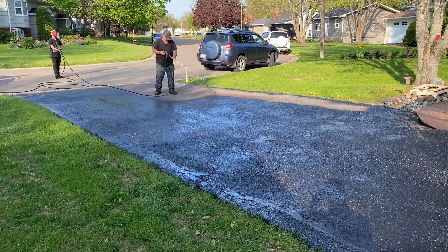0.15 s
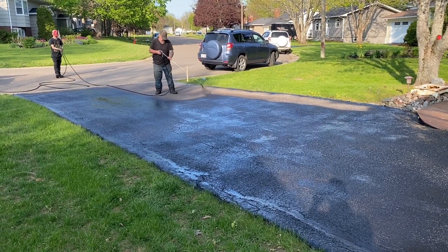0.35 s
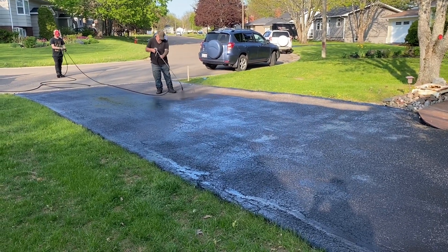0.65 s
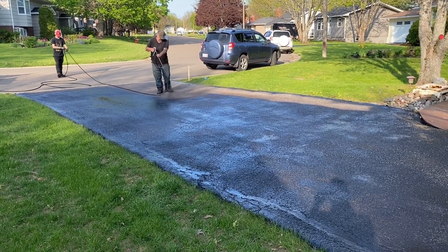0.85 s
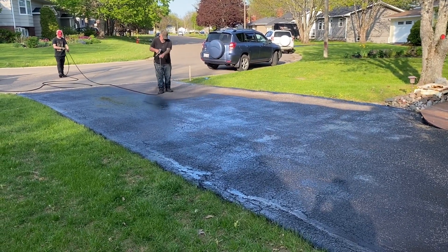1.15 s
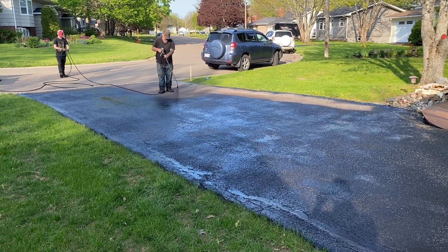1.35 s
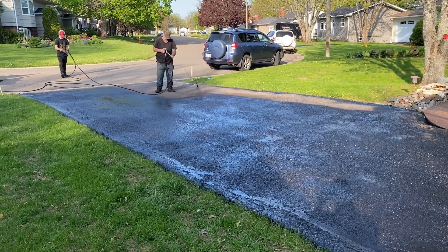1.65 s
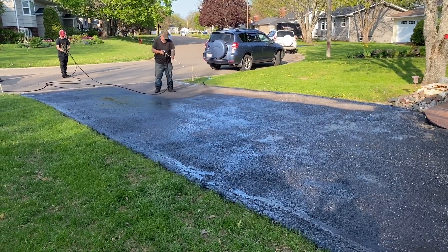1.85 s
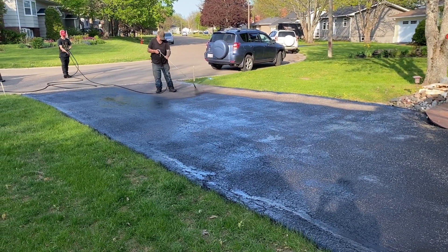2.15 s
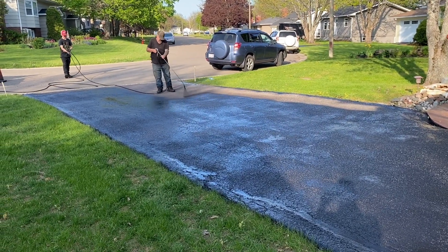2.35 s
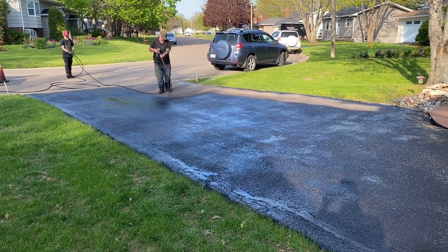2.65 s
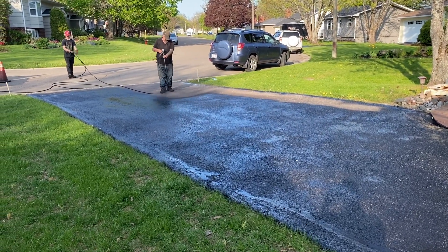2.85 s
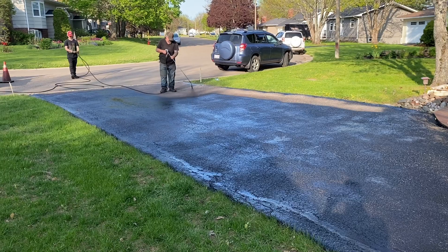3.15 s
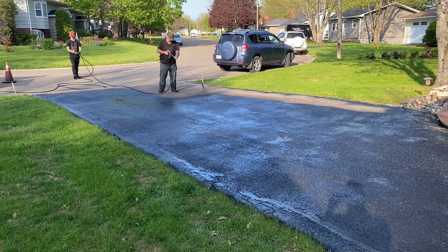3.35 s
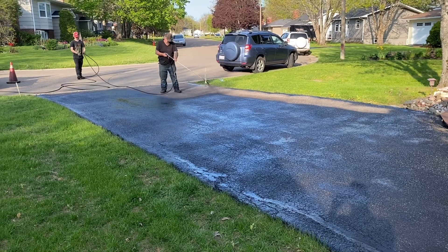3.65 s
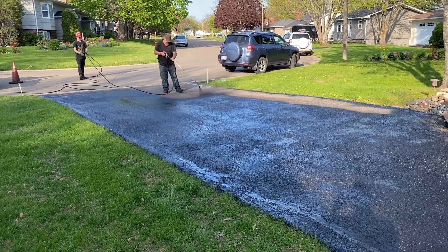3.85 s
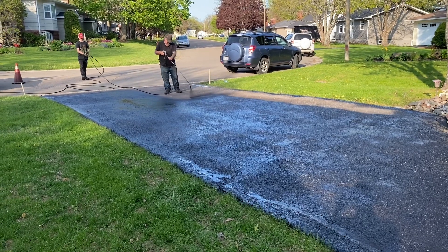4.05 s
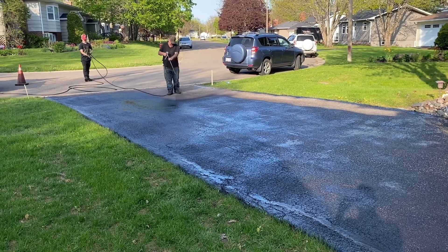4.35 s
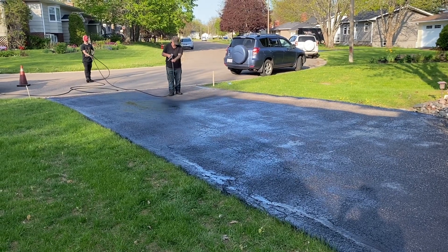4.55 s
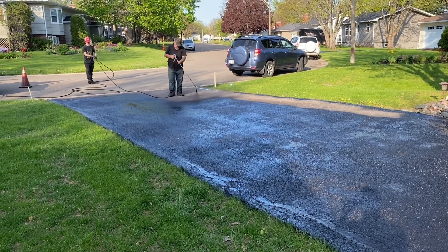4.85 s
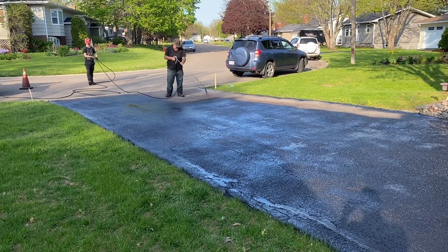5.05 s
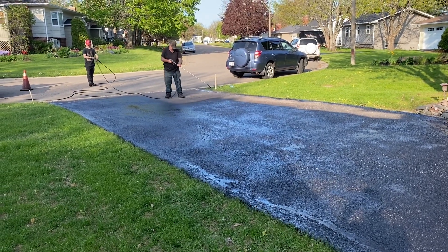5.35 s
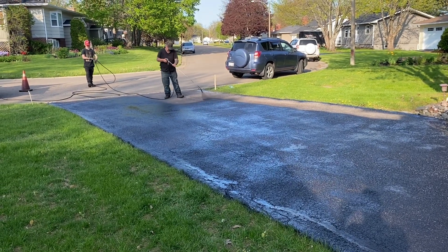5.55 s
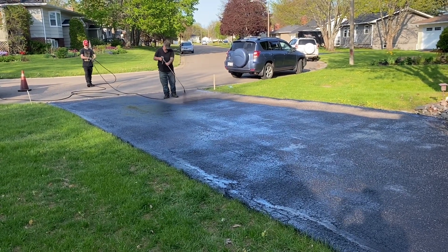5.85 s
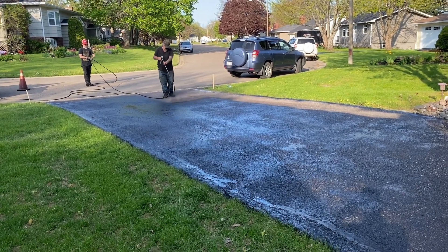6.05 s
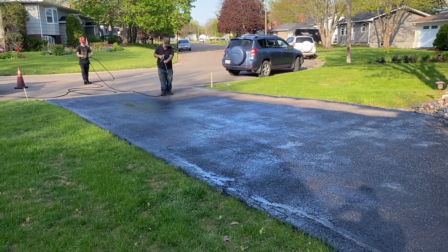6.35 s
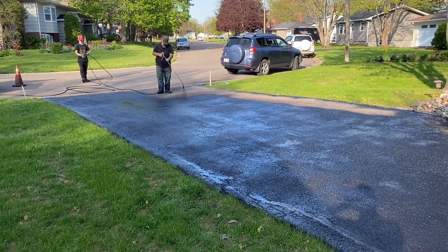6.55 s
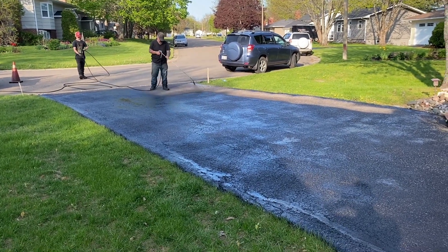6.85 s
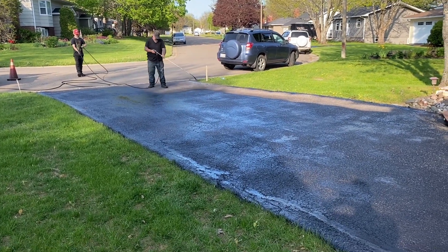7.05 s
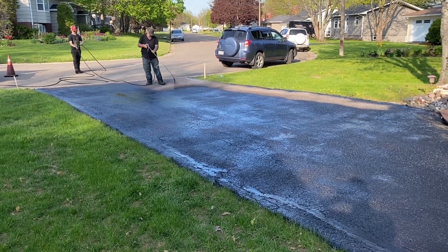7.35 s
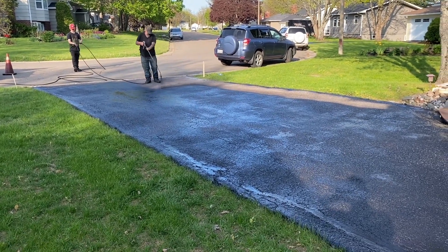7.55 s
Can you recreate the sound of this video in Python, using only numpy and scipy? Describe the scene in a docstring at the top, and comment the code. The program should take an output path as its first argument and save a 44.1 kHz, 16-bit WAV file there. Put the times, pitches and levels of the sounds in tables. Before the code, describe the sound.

From 0 s, already under way, a hand-held wand sprays liquid sealer on a driveway some metres from a handheld stereo microphone. The bright, slightly sputtering hiss sweeps to and fro, its hollow, comb-like swish sliding as the wand dips and rises. It shuts for about a twentieth of a second near 0.3, 1.2, 2.0, 2.9, 3.7, 4.6, 5.4, 6.3 and 7.1 s, reopening with a slight spurt; alternate turns sound splashier. Left of centre, a pump engine holds a low steady drone with fast, faint ringing knocks, over soft street wash. Small low wind puffs pass. From 5.2 s a breeze grows; light clacks cluster around 5.4-5.5 s, another at 5.8 s. Dull microphone bumps follow from 5.5 s, heaviest with a knock at 7.3 s. A faint narrow rush near 2 kHz rises from 5.6 s. Spray and engine run through the end, about 7.7 s.

```python
"""A driveway is sprayed with sealer from a wand some metres from a hand-held microphone with two ports.
From the start the wand sweeps to and fro and shuts briefly at each turn: filtered noise plus its moving
pavement echo makes the swish. A four-stroke pump engine, harmonics and ringing knocks, stands off to the left
over street wash and small noise gusts. After five seconds a breeze rises, and struck resonators give clacks
and dull bumps at the microphone; last, a faint narrow rush near 2 kHz comes up."""
import sys
import numpy as np
from scipy import signal
from scipy.fft import rfft, irfft, next_fast_len
from scipy.io import wavfile
from scipy.ndimage import map_coordinates

SR = 44100
rng = np.random.default_rng(int(sys.argv[2]) if len(sys.argv) > 2 else 0)


def to_wav(s):
    """Save 16-bit WAV."""
    ch = np.atleast_2d(s).T  # columns
    pcm = np.round(np.clip(ch, -1, 1) * 32767)  # PCM
    wavfile.write(sys.argv[1], SR, pcm.astype(np.int16))


N = 339129

# noise colours of the spray: (frequency [Hz], relative density [dB per Hz])
NOZZLE_SPECTRUM = [(700, -20), (1500, 7), (2600, 0.5), (3100, 9), (3600, 0.5), (4500, 6.5), (6300, -7.5),
                   (7500, 6), (10300, 6.5), (11800, 4), (15800, 1.5)]
SPLASH_SPECTRUM = [(1200, -15.5), (2000, -23), (2800, -10), (3500, -4), (4200, 6), (5100, 0), (6000, -1),
                   (7000, -3), (9000, -46), (16000, -48)]
SLAP_SPECTRUM = [(1800, -1), (2600, 5.5), (3050, 9), (3300, 1), (3600, 6), (4150, -8), (4600, -25),
                 (5000, -20), (8000, -44)]
# noise colours of the place: (frequency [Hz], relative density [dB per Hz])
STREET_SPECTRUM = [(20, -19), (45, -9.5), (80, 5), (150, 1.5), (200, -0.5), (260, -4), (430, -11),
                   (600, -15.5), (750, -10.5), (890, -4.5), (1010, -13.5), (1150, -13), (1290, -23.5),
                   (1480, -11.5), (1780, -16), (2080, -13.5), (2700, -17), (4000, -19), (6000, -25.5),
                   (16000, -50)]
GUST_SPECTRUM = [(12, -32), (30, -8), (50, 3), (90, 4.5), (160, -11.5), (250, -12.5), (400, -54),
                 (1000, -72)]
RUSH_SPECTRUM = [(1850, -36), (2080, 8), (2300, -31), (2520, -7), (2700, -24), (4000, -60)]
# phase by which the left port leads the right: (frequency [Hz], phase [rad])
SPRAY_PORT_PHASE = [(1000, 0), (2200, .1), (3000, .8), (4000, .4), (5500, 1.6), (7000, 0), (8400, -2.5),
                    (9500, -3.4), (11200, -6.3), (12800, -9.1), (13700, -9.6), (15000, -12.5)]
ENGINE_PORT_PHASE = [(60, .05), (130, 0.24), (300, 0.71), (450, 0.25), (580, 1.52), (950, 1.16),
                     (1200, 3.07), (1500, 3.65), (2400, 0.61)]  # also for street, wind and rush
# share of noise power common to both ports: (frequency [Hz], share [0-1])
SPRAY_PORT_LIKENESS = [(1500, .55), (4000, .9), (6000, .76), (7800, .82), (9000, .97), (10200, .89),
                       (12200, .86), (13300, .97), (16000, .88)]
STREET_PORT_LIKENESS = [(50, .96), (250, .8), (600, .68), (1300, .35), (2200, .65), (12000, .5)]  # also for wind and rush

# what the rough pavement reflects: (frequency [Hz], gain [dB])
PAVEMENT_REFLECTION = [(2000, -8), (3300, -4.5), (5500, -5.5), (8000, -7), (11000, -7), (16000, -11)]
# standing ripples that nearby surfaces put on the spray: (frequency [Hz], gain [dB])
SURFACE_RIPPLES = [(1500, 1.5), (1760, -6), (2100, 3), (2480, 3), (2650, -3), (3030, -2), (3250, -5),
                   (3450, 6), (3830, -0.5), (4130, 0.5), (4400, -1.5), (4780, 1), (5000, 4), (5400, 2.2),
                   (5720, 3.5), (6000, 0.5), (6400, 3), (6900, 1.5), (7250, 2.5), (8000, -0.5)]
# wand turns, far and near side alternately; each starts a sweep: (trigger opens [s], pause before it [s],
# pavement echo lag at the turn [ms], lag at the bottom of the sweep [ms], splash level before swell and trim [dB],
# hiss level before low-wand boost, spurt and trim [dB], lead at the left port [microseconds])
WAND_TURNS = [(-.52, 0.049, 0.31, 0.18, -46, -40, 20), (0.306, 0.057, 0.24, 0.16, -34.5, -41.5, -17),
              (1.17, 0.051, 0.31, 0.2, -42, -41, 33), (2.025, 0.053, 0.25, 0.17, -36, -42, -13),
              (2.86, 0.061, 0.28, 0.19, -43, -40.5, 21), (3.695, .056, 0.25, 0.17, -35, -41, -20),
              (4.588, 0.049, 0.31, 0.18, -40.5, -41.5, 19), (5.401, 0.058, 0.26, 0.19, -35.5, -40.5, -13),
              (6.263, 0.055, 0.28, 0.18, -45, -41, 25), (7.066, 0.05, 0.25, 0.15, -37.5, -41, 3),
              (7.92, .055, 0.27, .17, -46.5, -43, 69)]
# arc of a sweep: share of the way at which the wand is lowest, flatness of the dip [power], splash swell [dB]
BACK_LOWEST, BACK_FLATNESS, BACK_SWELL_DB = 0.42, 2.75, 4.5
OUT_LOWEST, OUT_FLATNESS, OUT_SWELL_DB = 0.26, 1.2, 1.1
LOW_HISS_DB = 1.2  # the hiss is louder with the wand low
SPURT_DB, SPURT_S = 1, 0.023  # pressure gathers behind the shut valve and escapes as it opens

# engine speed: (time [s], firings per second [Hz])
FIRING_RATE = [(0, 21.39), (1.2, 21.325), (2.2, 21.39), (2.6, 21.42), (4, 21.445), (4.8, 21.41),
               (7.69, 21.4)]
# engine level on top of its exhaust and clatter: (time [s], level [dB])
ENGINE_GAIN = [(0, -0.24), (4.7, 0.46), (5.8, -1), (7.69, -2.5)]
# exhaust note; alternate firings differ a little, which gives half orders:
# (order [multiple of the firing rate], level before waver and trim [dB])
EXHAUST_ORDERS = [(2, -39), (3, -20.5), (4, -6.5), (5, 1), (5.5, -29), (6, -12.5), (6.5, -22.5), (7, -7.5),
                  (7.5, -29), (8, -12.5), (9, -11), (10, -7.5), (10.5, -33), (11, -15.5), (11.5, -28.5),
                  (12, -22), (12.5, -35), (13, -13), (14, -17.5), (14.5, -32.5), (15, -20), (15.5, -37),
                  (16, -16.5), (17, -28.5), (18, -28.5), (19, -37.5)]
# how the muffler delays the orders against each other: (phase [rad per log order], phase [rad per squared order])
MUFFLER_PHASE = (92.41, -.1125)
# valve and piston knocks, each rung through two equal resonators in a row:
# (place in the cycle [share], pitch [Hz], rms level before trim [dB], t60 of each resonator [s])
ENGINE_KNOCKS = [(.177, 477, -67.5, 0.011), (0.238, 1004, -56.5, 0.0085), (0.447, 896, -53.5, 0.009),
                 (0.457, 2014, -59, 0.0061), (0.55, 542.6, -55, 0.026), (0.579, 758, -51, 0.02),
                 (0.603, 814, -55.5, 0.044), (.578, 1035, -52, 0.013), (0.851, 1084, -56, 0.036),
                 (0.87, 984, -61, 0.022), (0.871, 592, -60.5, 0.0081)]
# where in its cycle the engine starts, and when the exhaust follows [share of a cycle]
START_SHARE, EXHAUST_SHARE = .055, .4713

# wind on the microphone: calm at first, then a breeze gets up
CALM_DB, BREEZE_DB, BREEZE_FROM_S, BREEZE_RISE_S = -44.5, -34, 5.16, 0.35
# gusts: (peak time [s], width between the points at 1/e of peak power [s], level [dB])
WIND_GUSTS = [(.21, 0.048, -32), (0.845, 0.074, -36), (1.88, .18, -37), (2.3, 0.2, -40), (3.0, .2, -45),
              (3.49, 0.045, -35), (3.77, 0.25, -34.5), (5.752, 0.28, -34.5), (6.245, 0.11, -34),
              (6.693, 0.054, -37), (7.38, 0.49, -32.5), (7.67, 0.086, -29)]
# light clacks: (time [s], level before mode and tilt [dB], scuff decay constant [s], brightness [dB per octave])
CLACK_EVENTS = [(5.355, -37, .002, 4), (5.387, -36, 0.0045, -2), (5.397, -29.5, 0.0015, 1),
                (5.401, -36, .0006, -7), (5.478, -33, .0006, 0), (5.517, -37.5, 0.00046, 6),
                (5.775, -40, .001, -1), (7.59, -42, .002, 15)]
# their ringing: (pitch [Hz], relative level [dB], t60 [s])
CLACK_RINGING = [(720, -6, .016), (1000, 0, .02), (1330, -2, .018), (1650, -3, .016), (2150, -6, .014),
                 (2500, -8, .012), (3200, -13, .008)]
# bumps on the microphone, before the soft filter:
# (time [s], thud blow [dB], thud pitch [Hz], hard knock blow [dB])
MICROPHONE_BUMPS = [(5.489, -10, 70.5, -49), (5.669, -17, 64.6, -52), (5.72, -14, 75, -50),
                    (5.775, -22, 130, -32), (6.209, -15, 133, -46), (6.225, -14.5, 61, -49),
                    (6.315, -16, 97.5, -50), (6.688, -18, 52, -48), (6.965, -15.5, 112, -52),
                    (7.28, -18, 150, -42), (7.286, -1.5, 107.4, -10.5), (7.408, -19, 90, -47),
                    (7.663, -17, 90, -32)]

LEFT_RIGHT = np.array([[1], [-1]])  # turns a level [dB] into a boost on the left and an equal cut on the right


def from_db(db):
    """Decibels to gain."""
    return 10 ** (np.asarray(db) / 20)


def rms_one(x):
    """Scale to unit power."""
    return x / np.sqrt(np.mean(x ** 2) + 1e-20)


def in_time(rows):
    """Read each column of a table against time at every sample."""
    times, *columns = np.transpose(rows)
    return [np.interp(np.arange(N) / SR, times, column) for column in columns]


def at_bins(points):
    """Read a table over log frequency at the bins of a padded spectrum."""
    hz = np.fft.rfftfreq(next_fast_len(N + SR // 4), 1 / SR)
    table_hz, values = np.transpose(points)
    return np.interp(np.log(hz + 1), np.log(table_hz), values)


def filtered(x, response):
    """Apply a frequency response."""
    size = next_fast_len(N + SR // 4)
    return irfft(rfft(x, size) * response, size)[..., :N]


def drift(rate):
    """Random wander: independent Gaussian knots of spread 1, rate knots a second, joined by straight lines."""
    knots = rng.standard_normal(4000)
    return np.interp(np.arange(N) / SR * rate, np.arange(len(knots)), knots)


def two_ports(x, phase):
    """One sound as it arrives at the left and right microphone ports."""
    return np.array([filtered(x, np.exp(1j * at_bins(phase))), x])


def stereo_noise(spectrum, likeness, phase):
    """Coloured noise, partly shared by the two ports; rms 1."""
    shared = rng.standard_normal(N)
    own = rng.standard_normal((2, N))
    alike = np.clip(at_bins(likeness), 0, 1)
    colour = from_db(at_bins(spectrum))
    common_part = filtered(two_ports(shared, phase), colour * np.sqrt(alike))
    own_part = filtered(own, colour * np.sqrt(1 - alike))
    return rms_one(common_part + own_part)


def delayed(x, lag_s):
    """Read every channel a fixed or moving lag late."""
    places = [np.arange(N) - lag_s * SR]
    return np.array([map_coordinates(side, places, order=3, mode="mirror") for side in x])


def clicks(times, level_db):
    """Single-sample blows."""
    out = np.zeros(N)
    places = np.round(np.asarray(times) * SR).astype(int)
    out[np.clip(places, 0, N - 1)] = from_db(level_db)
    return out


def ring(blows, hz, t60):
    """A damped resonator: a unit click starts a sine of height 1 that falls 60 dB in t60 seconds."""
    decay = from_db(-60 / (t60 * SR))
    turn = 2 * np.pi * hz / SR
    # the tiny offset keeps the filter clear of denormal numbers
    return signal.lfilter([0, np.sin(turn)], [1, -2 * decay * np.cos(turn), decay ** 2], blows + 1e-18)


def sweep_clock():
    """At every sample: which sweep is under way, how far along it is (0-1), and the seconds since it began."""
    t = np.arange(N) / SR
    starts = np.array(WAND_TURNS)[:, 0]
    sweep = np.clip(np.searchsorted(starts, t) - 1, 0, len(starts) - 2)
    since = t - starts[sweep]
    return sweep, since / np.diff(starts)[sweep], since


def wand():
    """The wand swings high at the turns and low between: echo lag (ms), splash (dB), hiss (dB)."""
    _, _, turn_lag_ms, low_lag_ms, *_ = np.transpose(WAND_TURNS)
    *_, splash_db, hiss_db, _ = in_time(WAND_TURNS)
    sweep, along, since = sweep_clock()
    outward = sweep % 2 == 1
    lowest = np.where(outward, OUT_LOWEST, BACK_LOWEST)
    flatness = np.where(outward, OUT_FLATNESS, BACK_FLATNESS)
    rising = along > lowest
    # height runs from 1 at a turn to 0 at the lowest point and back
    height = np.abs((along - lowest) / (rising - lowest)) ** flatness
    lag_ms = (1 - height) * low_lag_ms[sweep] + height * turn_lag_ms[sweep + rising]
    swell_db = np.where(outward, OUT_SWELL_DB, BACK_SWELL_DB) * np.sin(np.pi * along)
    spurt_db = SPURT_DB * np.exp(-since / SPURT_S)
    return lag_ms, splash_db + swell_db, hiss_db + LOW_HISS_DB * (1 - height) + spurt_db


def trigger(close_s=.01, open_s=.003, tail_s=.05, tail_share=.032):
    """Flow gain of the valve, shut at each turn; the surroundings hold a faint tail after it shuts."""
    t = np.arange(N) / SR
    flow = np.ones(N)
    for reopen, pause_s, *_ in WAND_TURNS:
        closing = np.clip((t - (reopen - pause_s)) / close_s + .5, 0, 1)
        not_reopened = np.clip((reopen - t) / open_s + .5, 0, 1)
        flow *= 1 - closing * not_reopened
    keep = np.exp(-1 / (tail_s * SR))
    tail_power = tail_share * signal.lfilter([1 - keep], [1, -keep], flow ** 2)
    return np.sqrt(flow ** 2 + tail_power)


def swung(jet, split_hz=7000):
    """The lower part of the hiss swings from side to side with the wand, reaching one port earlier."""
    *_, lead_us = in_time(WAND_TURNS)
    low = filtered(jet, at_bins([(split_hz, 1), (split_hz + 500, 0)]))
    left, right = low[:1], low[1:]
    half_s = lead_us / 2e6  # half the lead on each side, in seconds
    return jet - low + np.vstack([delayed(left, -half_s), delayed(right, half_s)])


def spray(nozzle_db=1.4, splash_db=-5.5, splash_echo=0.82, slap_db=-45.5, slap_db_per_ms=89.0,
          slap_left_db=3.5, sputter_db=0.22, surge_db=0.99):
    """The jet hisses at the nozzle and splashes below; the pavement echo combs both as the wand rises and dips."""
    lag_ms, splash_level, nozzle_level = wand()

    def noise(spectrum):
        return stereo_noise(spectrum, SPRAY_PORT_LIKENESS, SPRAY_PORT_PHASE)

    hiss = noise(NOZZLE_SPECTRUM) * from_db(nozzle_level + nozzle_db)
    splash = noise(SPLASH_SPECTRUM) * from_db(splash_level + splash_db)
    # with the wand highest, at the far end of a swing, the fan lands with a lower, hollow slap
    slap_level = slap_db + slap_db_per_ms * np.minimum(lag_ms - .28, 0)
    slap = noise(SLAP_SPECTRUM) * from_db(slap_level + slap_left_db * LEFT_RIGHT)
    reflected = filtered(hiss + slap + splash_echo * splash, from_db(at_bins(PAVEMENT_REFLECTION)))
    echo = delayed(reflected, lag_ms / 1000)
    # the liquid sheet tears unevenly into drops
    unevenness = from_db(sputter_db * drift(350) + surge_db * drift(40))
    jet = (hiss + splash + slap + echo) * trigger() * unevenness
    return filtered(swung(jet), from_db(at_bins(SURFACE_RIPPLES)))


def exhaust(cycle, level_db=-33.5, waver_db=0.1, uneven_db=0.67):
    """One puff per firing; the muffler holds the low orders back and smears the puff into a drone."""
    note = 0
    for order, order_db in EXHAUST_ORDERS:
        held_back = np.dot(MUFFLER_PHASE, [np.log(order), order ** 2])
        phase = 2 * np.pi * order * (cycle - EXHAUST_SHARE) - held_back
        note = note + from_db(order_db + waver_db * drift(2.2)) * np.cos(phase)
    # the level varies at about the firing rate, 21.4 Hz
    return np.sqrt(2) * note * from_db(level_db + uneven_db * drift(21.4))


def clatter(cycle, level_db=0.87, uneven_db=1.0, loose_s=.00003):
    """Each knock swells and dies in its own part of the cycle, a little different in strength and timing each time."""
    turns = np.arange(np.floor(cycle[-1]))
    out = 0
    for share, hz, db, t60 in ENGINE_KNOCKS:
        late, strength = rng.standard_normal((2, len(turns)))
        times = np.interp(turns + share, cycle, np.arange(N) / SR)
        blows = clicks(times + loose_s * late, uneven_db * strength)
        knock = ring(ring(blows, hz, t60), hz, t60)
        out = out + from_db(db + level_db) * rms_one(knock)
    return out


def engine(hunt_hz=0.018, exhaust_left_db=0.5, clatter_left_db=3.5):
    """The pump engine stands off to the left; exhaust and knocks follow one slightly wandering cycle."""
    speed, = in_time(FIRING_RATE)
    level_db, = in_time(ENGINE_GAIN)
    cycle = START_SHARE + np.cumsum(speed + hunt_hz * drift(10)) / SR
    drone = two_ports(exhaust(cycle), ENGINE_PORT_PHASE) * from_db(exhaust_left_db * LEFT_RIGHT)
    knocks = two_ports(clatter(cycle), ENGINE_PORT_PHASE) * from_db(clatter_left_db * LEFT_RIGHT)
    return from_db(level_db) * (drone + knocks)


def street(level_db=-37.5):
    """The wash of the street and the engine's scattered sound, as steady coloured noise."""
    return from_db(level_db) * stereo_noise(STREET_SPECTRUM, STREET_PORT_LIKENESS, ENGINE_PORT_PHASE)


def wind_strength():
    """Wind level (dB): calm or breeze, with the power of gusts that swell and die on top of it."""
    t = np.arange(N) / SR
    risen = np.clip((t - BREEZE_FROM_S) / BREEZE_RISE_S, 0, 1)
    breeze = from_db(CALM_DB + (BREEZE_DB - CALM_DB) * risen)
    gusts = sum(from_db(db) ** 2 * np.exp(-(2 * (t - peak_s) / width_s) ** 2) for peak_s, width_s, db in WIND_GUSTS)
    return 10 * np.log10(breeze ** 2 + gusts)


def wind():
    """Air buffets the two ports as low noise that follows the wind strength."""
    return stereo_noise(GUST_SPECTRUM, STREET_PORT_LIKENESS, ENGINE_PORT_PHASE) * from_db(wind_strength())


def clacks(grit_share=0.1):
    """Each contact is a sharp tick and a short gritty scuff into a few damped modes, with its own brightness."""
    out = np.zeros(N)
    t = np.arange(SR // 20) / SR
    pivot_hz = CLACK_RINGING[2][0]  # the tilt turns about the third mode
    for time_s, level_db, scuff_s, tilt_db in CLACK_EVENTS:
        grit = rng.standard_normal(len(t)) * np.exp(-t / scuff_s)
        contact = signal.unit_impulse(len(t)) + grit_share * grit / np.linalg.norm(grit)
        sound = 0
        for hz, mode_db, t60 in CLACK_RINGING:
            gain = from_db(level_db + mode_db + tilt_db * np.log2(hz / pivot_hz))
            sound = sound + ring(contact, hz, t60) * gain
        start = int(time_s * SR)
        out[start:start + len(t)] += sound[:N - start]
    return out


def bumps(thud_cycles=5.2, knock_hz=320, knock_t60=0.02, soft_hz=680, left_lag_s=0.00039):
    """Each soft bump gives a low thud and its own amount of knock on the casing; the left port hears it later."""
    # a thud falls 60 dB in thud_cycles periods of its pitch
    thuds = sum(ring(clicks(time_s, db), hz, thud_cycles / hz) for time_s, db, hz, _ in MICROPHONE_BUMPS)
    times, _, _, knock_db = np.transpose(MICROPHONE_BUMPS)
    sound = thuds + ring(clicks(times, knock_db), knock_hz, knock_t60)
    sound = signal.sosfilt(signal.butter(3, soft_hz, fs=SR, output="sos"), sound)
    return np.array([delayed([sound], left_lag_s)[0], sound])


def rush(level_db=-53.5, from_s=5.6, rise_s=.8):
    """A faint, narrow band of noise near 2 kHz comes up toward the end."""
    swell = np.clip((np.arange(N) / SR - from_s) / rise_s, 0, 1)
    return from_db(level_db) * swell * stereo_noise(RUSH_SPECTRUM, STREET_PORT_LIKENESS, ENGINE_PORT_PHASE)


def scene():
    """All sources at the microphone."""
    return spray() + engine() + street() + wind() + clacks() + bumps() + rush()


def record(dry):
    """The recorder cuts the deepest rumble below 32 Hz and the top above 15.8 kHz."""
    dry = signal.sosfilt(signal.butter(4, 32, "high", fs=SR, output="sos"), dry)
    return signal.sosfilt(signal.ellip(12, .1, 90, 15800, fs=SR, output="sos"), dry)


dry = scene()
out = record(dry)
to_wav(out)
```